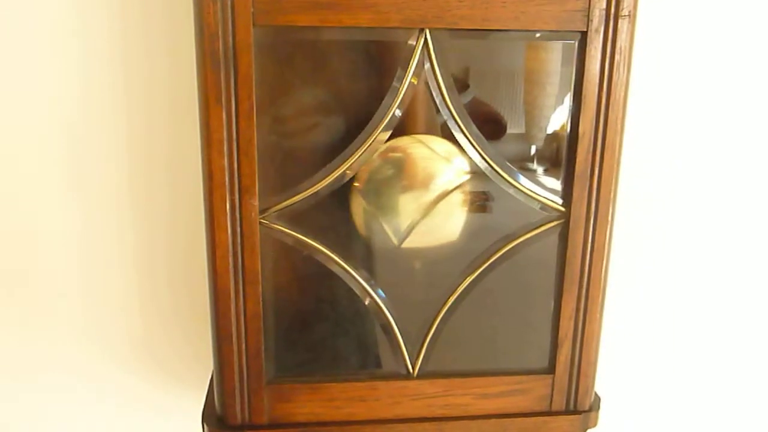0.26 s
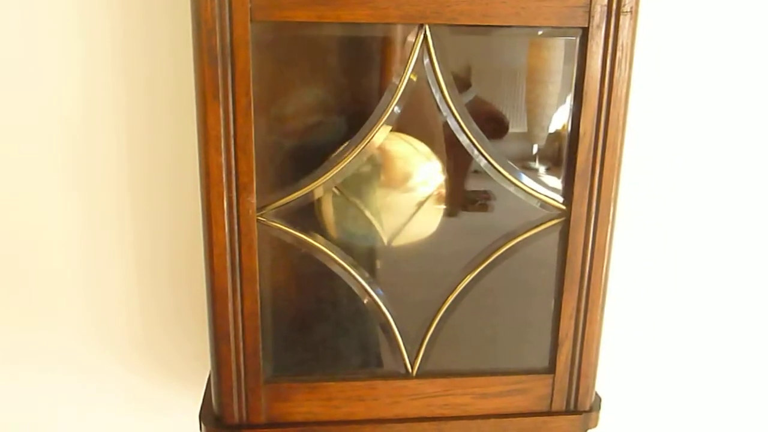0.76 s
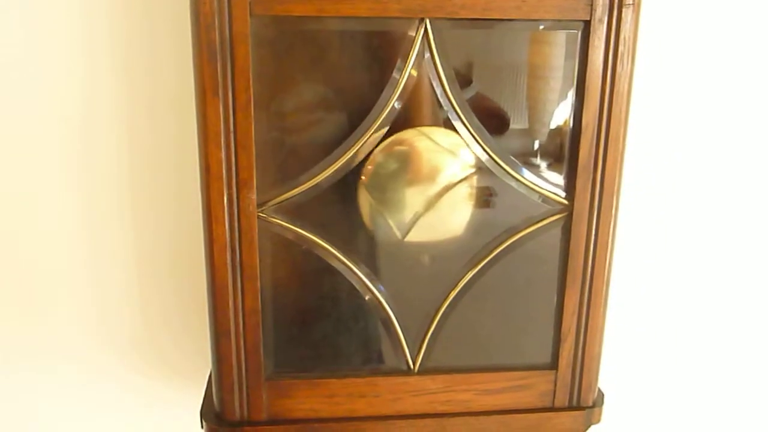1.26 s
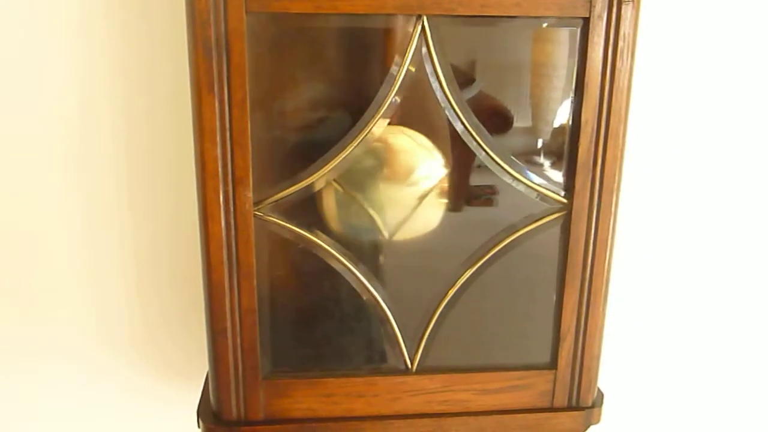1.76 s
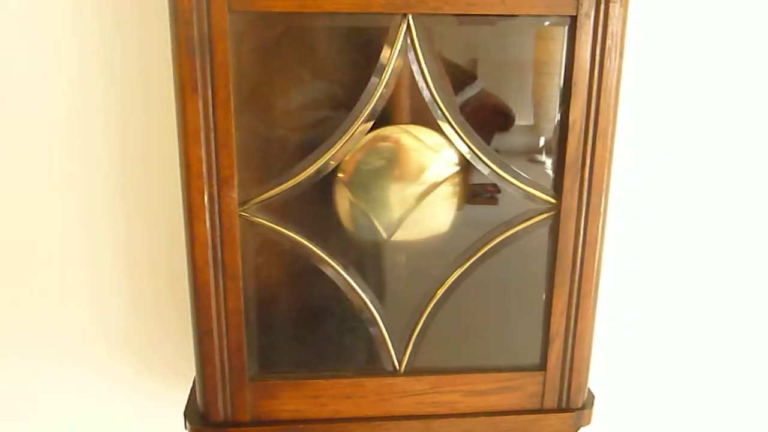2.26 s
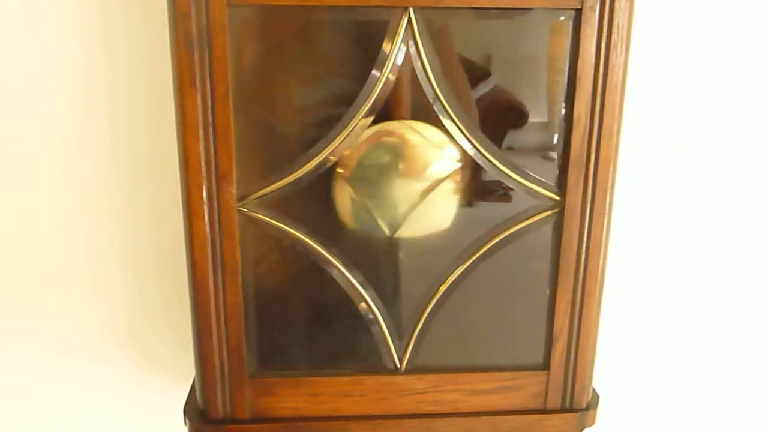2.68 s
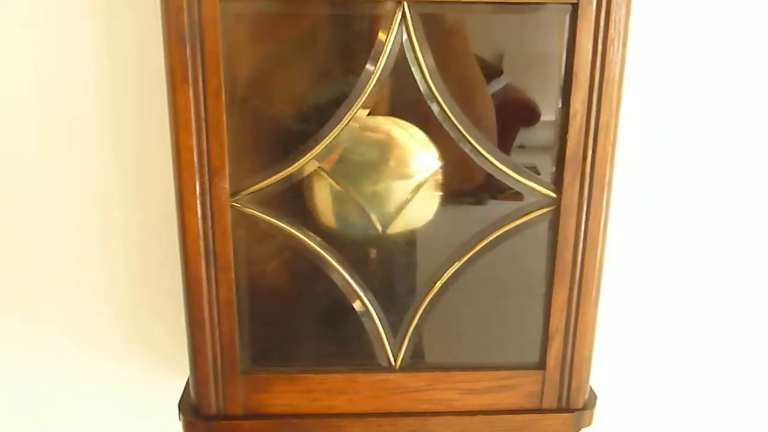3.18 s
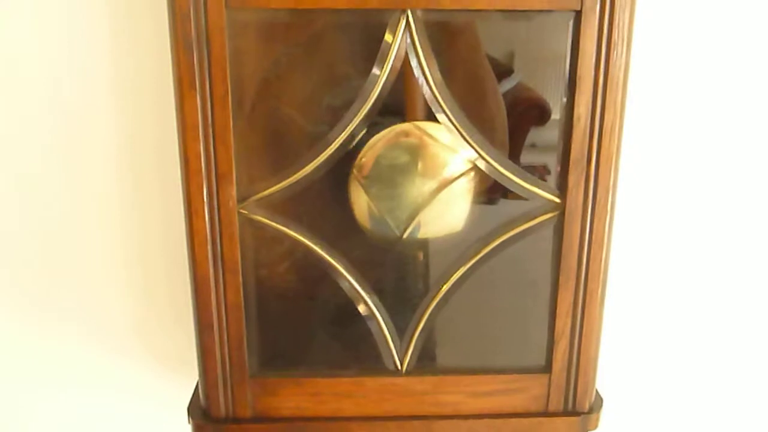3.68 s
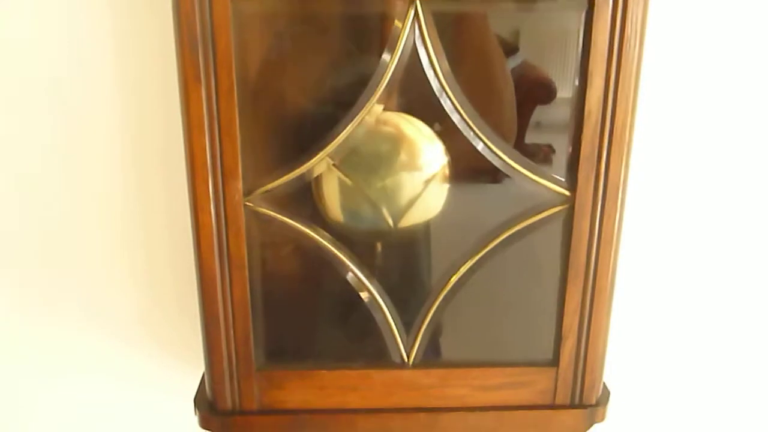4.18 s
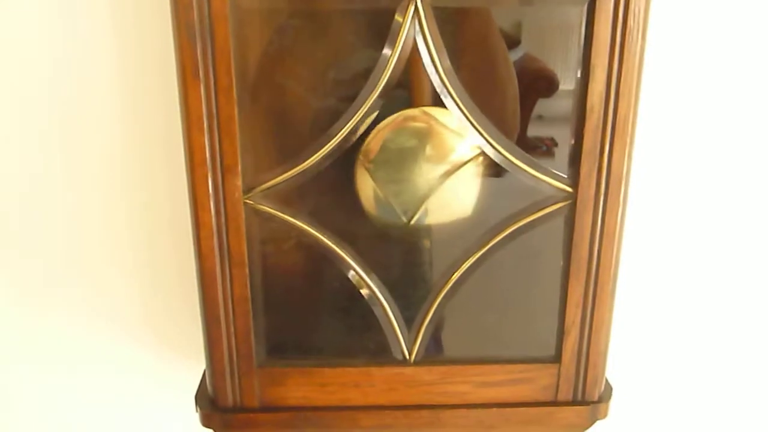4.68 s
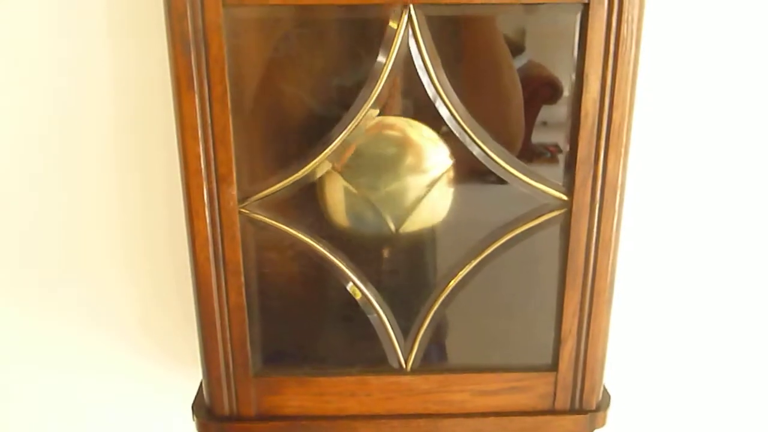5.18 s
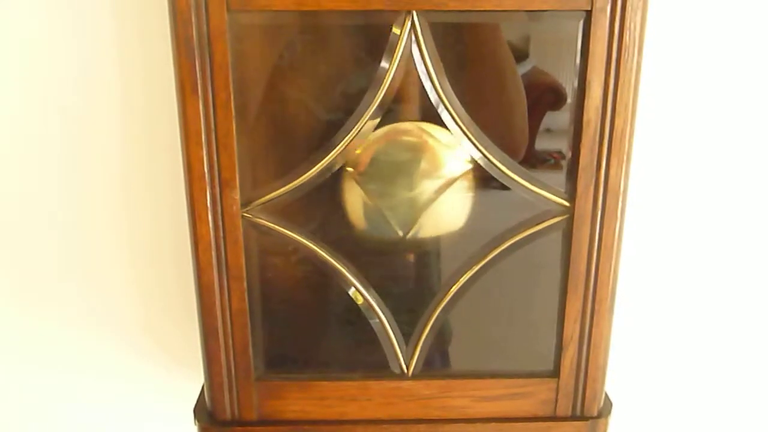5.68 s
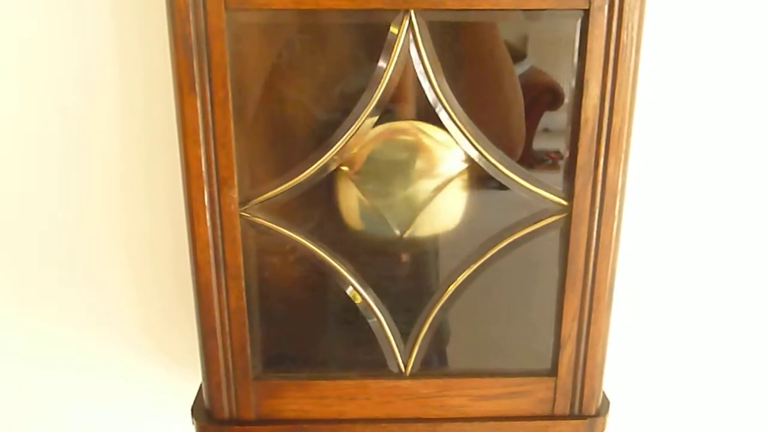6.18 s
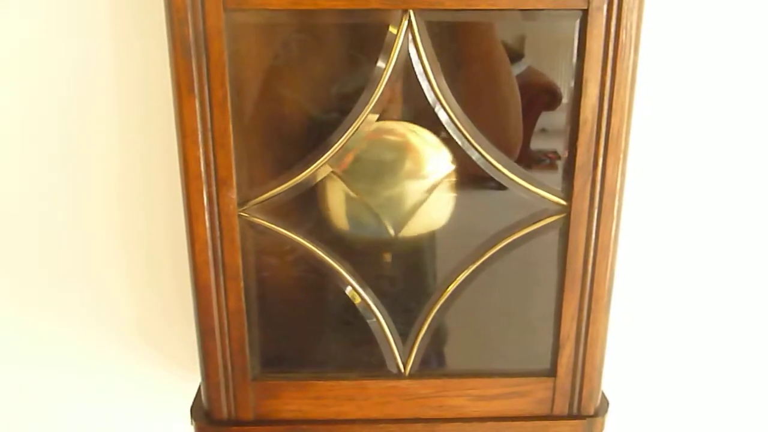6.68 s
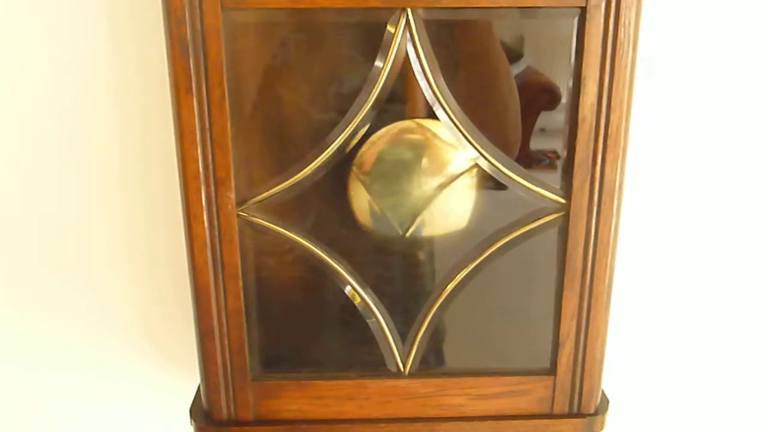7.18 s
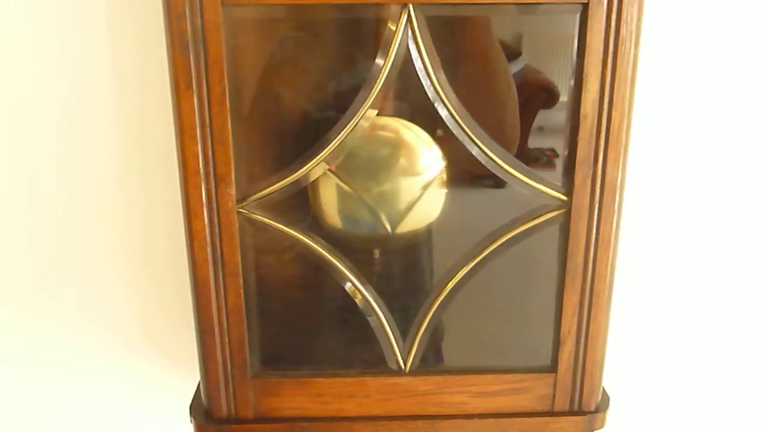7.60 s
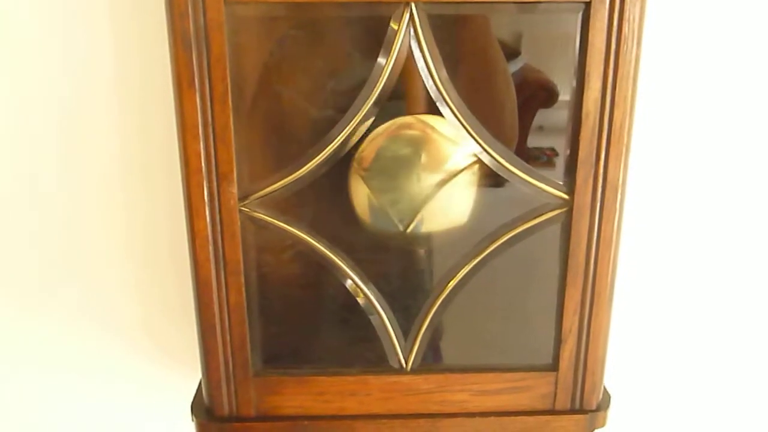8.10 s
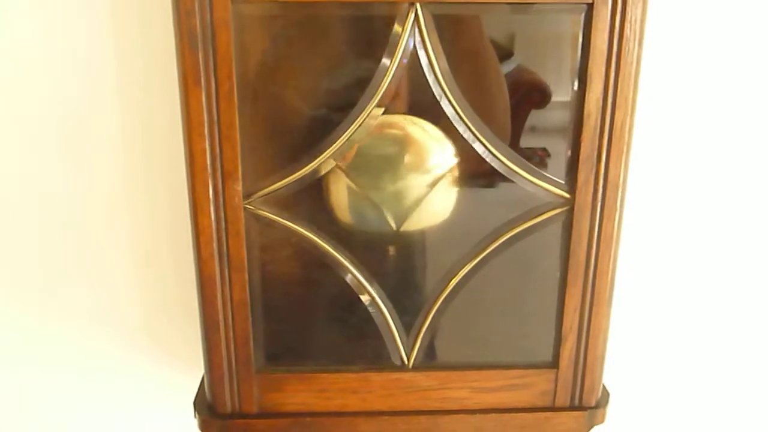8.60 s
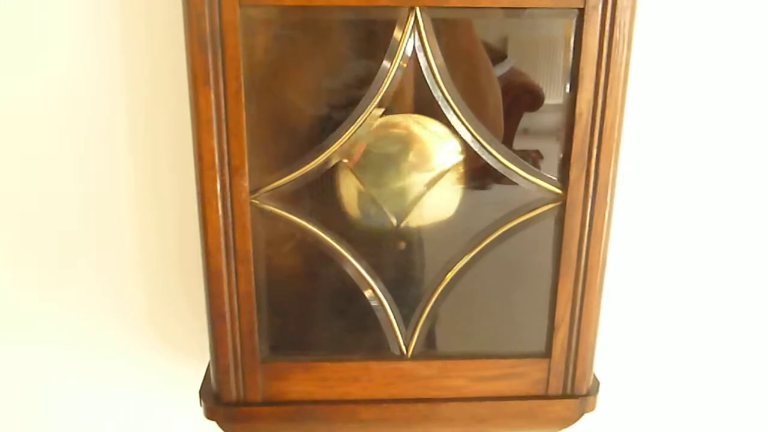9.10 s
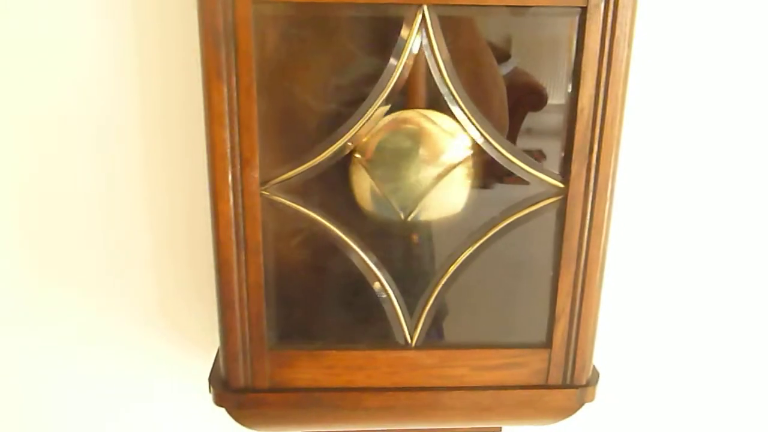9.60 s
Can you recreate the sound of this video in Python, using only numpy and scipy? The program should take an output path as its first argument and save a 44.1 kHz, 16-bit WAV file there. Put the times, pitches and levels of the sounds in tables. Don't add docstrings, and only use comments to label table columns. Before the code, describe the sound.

A large wooden clock's slow tick-tock overlaps a smaller clock's faster bright ticking; soft room hiss beneath, then a brief cloth rustle at the end.

```python
import sys
import numpy as np
from scipy import signal
from scipy.fft import rfft, irfft
from scipy.io import wavfile
from scipy.ndimage import uniform_filter1d

SR = 44100
rng = np.random.default_rng(int(sys.argv[2]) if len(sys.argv) > 2 else 0)


def transcribe(signal):
    frames = np.atleast_2d(signal).T
    limited = np.clip(frames, -1, 1)
    pcm = np.round(limited * 32767).astype(np.int16)
    wavfile.write(sys.argv[1], SR, pcm)


def convert_level_to_amplitude(level_db):
    exponent = np.asarray(level_db, float) / 20
    return 10 ** exponent


N = 434385


def evened(x):
    return x / np.sqrt(np.mean(x ** 2) + 1e-20)


def read(points, hz):
    point_hz, value = np.transpose(points)
    return np.interp(np.log(hz + 1), np.log(point_hz + 1), value)


def coloured(noise, spectrum):
    length = noise.shape[-1]
    gain = convert_level_to_amplitude(read(spectrum, np.fft.rfftfreq(length, 1 / SR)))
    return evened(irfft(rfft(noise) * gain, length))


def resonate(x, hz, width_hz):
    turn = np.exp(2j * np.pi * np.cumsum(hz * np.ones(len(x))) / SR)
    r = np.exp(-np.pi * width_hz / SR)
    return 2 * (turn * signal.lfilter([1 - r], [1, -r], x / turn)).real


def fuzzy_band(length, hz, width_hz):
    once = resonate(rng.standard_normal(length), hz, width_hz)
    return evened(resonate(once, hz, width_hz))


def swell(t, peak_ms, sharp):
    u = np.maximum(t, 0) * 1000 / peak_ms
    return (u * np.exp(1 - u)) ** sharp


def hiss():
    # hz, level_db_per_hz
    hiss_colour = [(12, -31.5), (25, -27.5), (42, -17), (80, -18.5), (126, -13), (160, -13), (316, -12.5),
                   (385, -15.5), (640, -19.5), (919, -21.5), (1300, -23.5), (1890, -27), (4000, -35),
                   (7600, -40)]
    level_db, patchy_db = -52, 0.67
    frames, hz = N // 512 + 5, np.fft.rfftfreq(2048, 1 / SR)
    a, b, patches = rng.standard_normal((frames, 1025, 3)).T
    patches = uniform_filter1d(patches, size=30, axis=0)
    patches = evened(uniform_filter1d(patches, size=8, axis=1))
    z = (a + 1j * b) * convert_level_to_amplitude(read(hiss_colour, hz)[:, None] + patchy_db * patches)
    return convert_level_to_amplitude(level_db) * evened(signal.istft(z, nperseg=2048, noverlap=1536)[1][:N])


def throb():
    # centre_s, level_db, length_s
    surge_table = [(.9, -66, .2), (1.43, -70, .25), (2.95, -64, .3), (3.25, -64, .15), (3.75, -64, .3),
                   (4.15, -61, .15), (4.62, -59, .25), (5.15, -66, .3), (5.703, -64, 0.33),
                   (6.2, -62, 0.41), (6.85, -64, .4), (8.7, -68, .5)]
    idle_db = -71.5
    t = np.arange(N) / SR
    pitch_hz = 55 + 2.5 * evened(uniform_filter1d(rng.standard_normal(N), size=6000))
    level = convert_level_to_amplitude(idle_db)
    for centre_s, db, length_s in surge_table:
        level = level + convert_level_to_amplitude(db) * np.exp(-(2 * (t - centre_s) / length_s) ** 2)
    return level * np.sin(2 * np.pi * np.cumsum(pitch_hz) / SR)


def drones():
    # pitch_hz, width_hz, level_db
    booms = [
        (118.45, 3.6, -70),
        (318.3, 17, -65.5),
    ]
    # pitch_hz, rms_db
    hum = [(23.4, -78), (99.9, -63), (797.3, -70)]
    # pitch_hz, rms_db
    whines = [(3555.6, -90), (4388.9, -90), (6222.1, -95), (6666.6, -93), (7555.5, -97)]
    t = np.arange(N) / SR
    out = np.zeros(N)
    for hz, width_hz, db in booms:
        out += convert_level_to_amplitude(db) * fuzzy_band(N, hz, width_hz)
    for hz, db in hum + whines:
        out += convert_level_to_amplitude(db) * np.sqrt(2) * np.sin(2 * np.pi * (hz * t + rng.random()))
    return out


def brush():
    # start_s, level_db, centre_hz
    scuffs = [
        (9.44, -57, 1900),
        (9.48, -53.5, 1700),
        (9.485, -56, 603),
        (9.555, -62, 1900),
        (9.52, -61, 1500),
        (9.591, -61, 1300),
        (9.64, -53.5, 1010),
        (9.69, -54, 750),
        (9.77, -56, 597),
    ]
    width_share, peak_ms, sharp = 0.67, 21.4, 1.8
    t, out = np.arange(SR // 10) / SR, np.zeros(N)
    for start_s, db, hz in scuffs:
        fibres = fuzzy_band(len(t), hz, width_share * hz)
        part = out[round(start_s * SR):][:len(t)]
        part += (convert_level_to_amplitude(db) * swell(t, peak_ms, sharp) * fibres)[:len(part)]
    return out


def room(x):
    # hz, t60_s
    decay = [(500, .3), (2000, .22), (5000, .1)]
    # hz, level_db
    tail_colour = [(500, -18), (1200, -12), (2200, -10), (4000, -13)]
    # late_ms, level_db, top_hz
    far_wall = (35, -17.5, 2600)
    taps = np.zeros(SR // 2)
    at = np.arange(400, len(taps) - 20, 20)
    taps[at + rng.integers(0, 20, len(at))] = rng.choice([-1., 1.], len(at))
    hz, t, z = signal.stft(taps, SR, nperseg=256)
    z = z * convert_level_to_amplitude(-60 * t / read(decay, hz)[:, None])
    energy = np.linalg.norm(signal.istft(z, SR, nperseg=256)[1])
    tail = signal.istft(z * convert_level_to_amplitude(read(tail_colour, hz))[:, None], SR, nperseg=256)[1] / energy
    tail[0] = 1
    late_ms, echo_db, top_hz = far_wall
    echo = signal.firwin(33, [1300, top_hz], pass_zero=False, fs=SR)
    tail[round(late_ms * SR / 1000):][:len(echo)] += convert_level_to_amplitude(echo_db) * echo
    return signal.fftconvolve(x, tail)[:len(x)]


def strikes(teeth, swing_s, heard_db):
    # time_s, turn_0_to_1
    mic_turn = [
        (0, 0.2),
        (1.5, 0.01),
        (2.3, .55),
        (4.4, 0.8),
        (7, .95),
        (9.85, 1.05),
    ]
    first_s, late_ms = teeth
    s = first_s + swing_s * np.arange(len(late_ms)) + np.array(late_ms) / 1000
    before, after = np.array(heard_db)
    turned = np.interp(s, *np.transpose(mic_turn))[:, None]
    return np.c_[s, before + turned * (after - before)]


def pallet(beats, modes, colour, rattle_db, rattle_ms, sharp, slide_db):
    uneven_db, rough, fresh = 1, .45, 1.2
    lead, slide = SR // 10, SR // 40
    t = (np.arange(lead) - slide) / SR
    hz, db, swell_ms, mode_sharp = np.array(modes).T[:, :, None]
    rings = convert_level_to_amplitude(db) * swell(t, swell_ms, mode_sharp)
    rings = rings * np.sin(2 * np.pi * (hz * t + rng.random(hz.shape)))
    envelope = convert_level_to_amplitude(rattle_db) * swell(t, rattle_ms, sharp)
    envelope += convert_level_to_amplitude(slide_db) * swell(t + slide / SR, 15.5, 7)
    usual = rng.standard_normal(lead)
    out = np.zeros(N + 2 * lead)
    for s, blow_db, bright_db, case_db, door_db in beats:
        part_db = [(750, case_db), (950, door_db), (1150, door_db), (1300, 0), (2150, 0),
                   (2300, .35 * bright_db), (3000, .35 * bright_db), (3300, bright_db)]
        heard_db = read(part_db, hz[:, 0])
        flutter = 1 + rough * evened(uniform_filter1d(rng.standard_normal(rings.shape), size=90))
        ring = convert_level_to_amplitude(heard_db + uneven_db * rng.standard_normal(len(modes))) @ (rings * flutter)
        rattle = envelope * coloured(usual + fresh * rng.standard_normal(lead), colour)
        at = lead - slide + round(s * SR)
        out[at:at + lead] += convert_level_to_amplitude(blow_db) * (ring + rattle)
    return out


def small_clock():
    # pitch_hz, peak_db, swell_ms, sharpness
    tick_modes = [(904, -59, 4, 3), (1528, -61, 8, 3), (1925, -50.5, 7, 2.5), (2368, -56, 3.5, 4),
                  (2347, -60, 13, 6), (2700, -60, 3.5, 3), (2950, -64, 3.5, 3), (3830, -61, 6, 2.2),
                  (4457, -70, 2.5, 3), (6201, -65, 4, 2.5), (7000, -68, 3, 2.5), (7350, -70, 4, 3)]
    tock_modes = [(947, -57, 5, 4), (968, -60, 18, 6), (1520, -61, 11, 3), (1916, -50, 9, 2.5),
                  (2090, -61, 6, 3), (2368, -57, 5, 4), (2347, -59, 14, 6), (2691, -63, 4, 3),
                  (3410, -69, 12, 2), (3850, -65, 6, 1.8), (5230, -68, 4, 1.6), (6200, -74, 4, 3),
                  (7060, -70, 4, 2.5)]
    # hz, level_db_per_hz
    rattle = [(500, -20), (1000, -7), (1500, -4), (2100, 0), (2800, -5), (3200, -17), (4500, -22),
              (7500, -25)]
    tick_teeth = .2292, [-4, -2, .5, 1.5, 1, 2, 2.5, 1, 1, .5, -3, 0, -3, -.5, -1, 2.5]
    tock_teeth = .5201, [-1, 2, .5, 1.5, 2, .5, -1.5, -.5, -4, -2.5, -1.5, .5, 1, 1.5, 0, .5]
    # blow_db, bright_metal_db, case_db, door_db
    tick_heard = [
        (-4, 5.5, 0, -0.5),
        (.5, -2, 0, 0),
    ]
    tock_heard = [
        (-1.3, 2.5, 0, 0),
        (.9, -3, 0, 0),
    ]
    swing_s = .61282
    tick = strikes(tick_teeth, swing_s, tick_heard)
    tock = strikes(tock_teeth, swing_s, tock_heard)
    beats = pallet(tick, tick_modes, rattle, -60, rattle_ms=7, sharp=1, slide_db=-65)
    return beats + pallet(tock, tock_modes, rattle, -58, rattle_ms=8, sharp=.9, slide_db=-60.5)


def large_clock():
    # pitch_hz, peak_db, swell_ms, sharpness
    tick_modes = [(640, -45.5, 15, 5), (1045, -47.5, 15, 3.5), (820, -58, 12, 3), (1350, -56, 10, 3),
                  (1620, -47, 4, 3), (1744, -50, 14, 8), (1722, -57, 26, 14), (1950, -53, 6, 3),
                  (2620, -60, 8, 3), (2780, -62, 2.5, 3), (3410, -62, 10, 1), (3660, -61, 6, 1.8),
                  (3860, -64, 8, 1.4), (5211, -66, 5, 2.5), (6880, -69, 3, 2), (7300, -70, 4, 2)]
    tock_modes = [(702, -51.5, 11, 5), (1110, -56, 15, 4), (1450, -58, 12, 3), (1614, -50, 3.5, 4),
                  (1780, -53.5, 13, 6), (2140, -65, 11, 3), (2500, -69, 6, 3), (3660, -71, 9, 3),
                  (4780, -67, 4, 2.5), (5000, -64, 6, 2.5), (5720, -72, 3, 3), (6869, -73, 2.5, 3)]
    # hz, level_db_per_hz
    rattle = [(350, -16), (700, -3), (1200, -1), (1800, 0), (2600, -9), (3700, -10), (4200, -23),
              (7500, -27)]
    tick_teeth = -.0134, [-4.5, 0, 0, .5, -3, 1.5, -5, 2.5, 7.5]
    tock_teeth = .562, [5.5, 2, .5, .5, -3, -1, -2.5, -2, -.5]
    # blow_db, bright_metal_db, case_db, door_db
    tick_heard = [
        (-5, 3, .6, 5.5),
        (-1.3, 0.5, 0.65, -4),
    ]
    tock_heard = [
        (-.2, 3, 2.5, 2.5),
        (.3, -1.5, .3, -1.5),
    ]
    swing_s = 1.1537
    tick = strikes(tick_teeth, swing_s, tick_heard)
    tock = strikes(tock_teeth, swing_s, tock_heard)
    beats = pallet(tick, tick_modes, rattle, -55, rattle_ms=10, sharp=1.1, slide_db=-72)
    return beats + pallet(tock, tock_modes, rattle, -60, rattle_ms=10, sharp=1.1, slide_db=-72)


def clocks():
    return room(small_clock() + large_clock())[SR // 10:][:N]


def scene():
    return (hiss() + throb() + drones() + brush() + clocks())[None]


def top_cut(x):
    return signal.sosfilt(signal.butter(12, 8890, fs=SR, output="sos"), x)


def record(dry):
    # hz, gain_db
    edge = [(7000, -0.5), (7700, -4), (8200, -9.5), (8600, -21.5), (8900, -28.5), (9300, -55)]
    offset = .0072
    hz = np.linspace(0, SR / 2, 1025)
    roll_off = signal.firwin2(1023, hz, convert_level_to_amplitude(read(edge, hz)), fs=SR)
    narrow = signal.oaconvolve(dry, roll_off[None], "same")
    return top_cut(narrow + offset)


dry = scene()
out = record(dry)
transcribe(out)
```